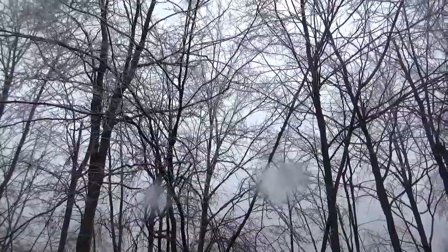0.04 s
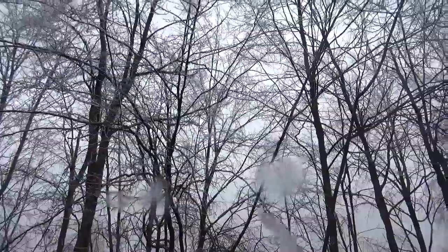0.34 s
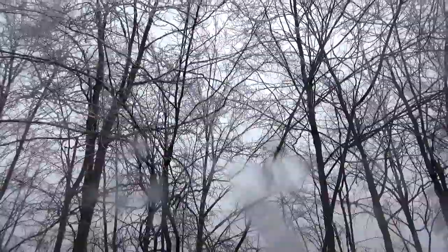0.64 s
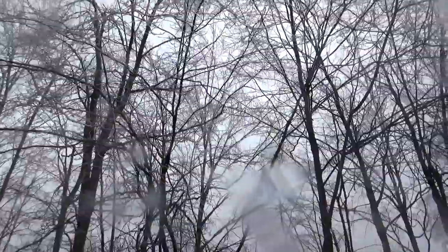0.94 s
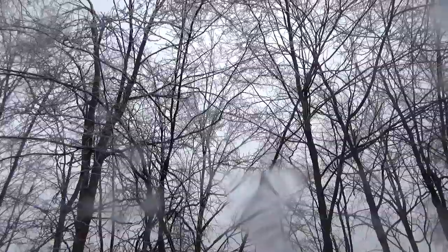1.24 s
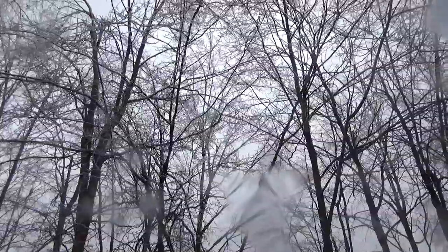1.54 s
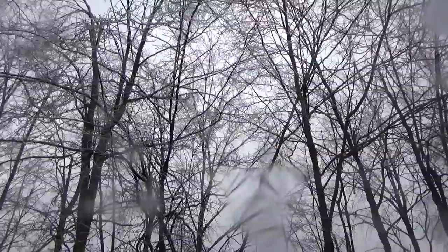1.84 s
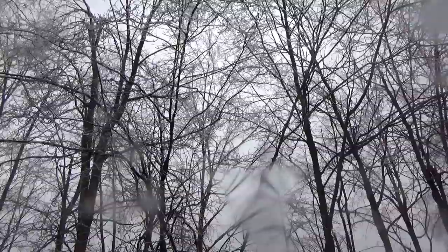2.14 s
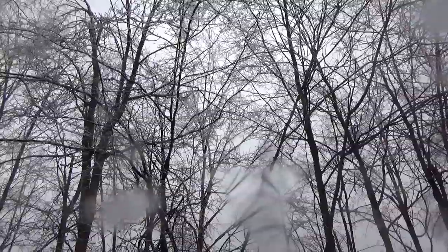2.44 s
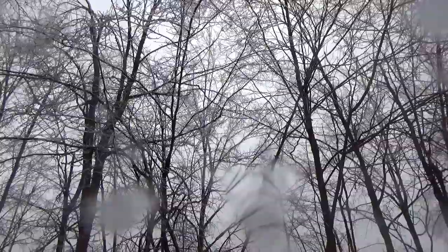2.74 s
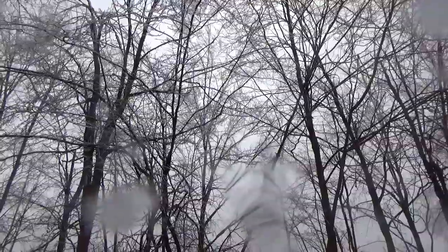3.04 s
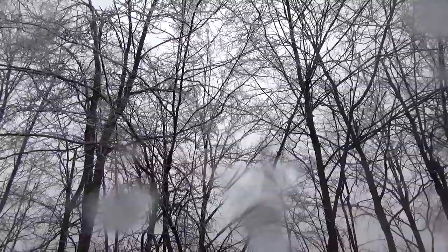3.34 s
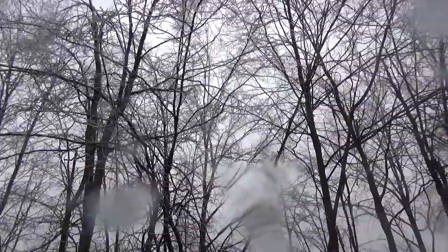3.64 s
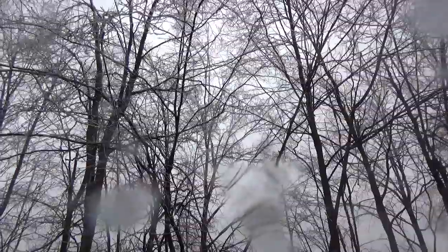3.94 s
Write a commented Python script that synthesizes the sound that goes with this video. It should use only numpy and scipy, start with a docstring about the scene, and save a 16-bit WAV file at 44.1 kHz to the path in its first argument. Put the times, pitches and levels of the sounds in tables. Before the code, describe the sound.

Freezing rain falls with a dense crackle, close taps and light wind on the microphone.

```python
"""A dense crackle of ice pellets over a far hiss, swelling and easing: freezing rain on bare trees
and frozen ground. Near pellets tick, heavier drops tap and splat, some thud on soft ground.
One pellet hits the microphone's case so hard that the limiter briefly ducks the rain.
Light wind buffets the microphone."""
import sys
import numpy as np
from scipy import signal
from scipy.fft import rfft, irfft
from scipy.io import wavfile
from scipy.ndimage import uniform_filter1d, minimum_filter1d

SR = 44100
rng = np.random.default_rng(int(sys.argv[2]) if len(sys.argv) > 2 else 0)


def materialize(psi):
    """Save the field psi as 16-bit PCM at rate SR to the path in sys.argv[1].

    A 1-D psi becomes a single channel; in a 2-D psi each row is a channel.
    """
    bounded = np.clip(np.atleast_2d(psi).T, -1, 1)
    quanta = np.round(bounded * 32767).astype(np.int16)
    wavfile.write(sys.argv[1], SR, quanta)


N = 176400
T = np.arange(N) / SR


def rain():
    """Far hiss, fine crackle and coarser ticks follow the strength of the shower."""
    # Each row: time in seconds, shower strength in dB.
    rainfall = [(0, -39), (.5, -40), (.8, -38.5), (1.0, -37), (1.25, -34.5), (1.45, -35), (1.75, -33),
                (1.85, -34), (2.03, -31.5), (2.15, -33.5), (2.35, -33.5), (2.6, -37), (2.8, -37),
                (2.95, -37), (3.52, -37.7), (3.58, -35.5), (3.77, -36), (3.85, -40.5), (4, -36.5)]
    # Each row: frequency in Hz, relative spectral density in dB.
    hiss_spectrum = [(200, -3.5), (450, -3.5), (900, -2.5), (1600, -4), (3000, -2.5), (4200, -3.5),
                     (5500, -3), (7000, -0.5), (9200, 1.84), (10200, 2), (11000, -8)]
    hiss = from_db(-1.5) * banded_noise(hiss_spectrum, patchy_db=1.28, flicker_hz=20.4, top_hz=15000)
    fine = from_db(-6.5) * crackle(per_s=5000, size_db=3.0, cycles=6, spread_db=16.5)
    coarse = from_db(-9.5) * crackle(per_s=170, size_db=3.5, cycles=4.1, spread_db=15)
    return from_db(in_time(rainfall)) * (hiss + fine + coarse) * panned(-0.35)


def crackle(per_s, size_db, cycles, spread_db, bands=16):
    """Pellets land at random all around, each with its own size, pitch and direction; rms 1."""
    # Each row: pellet pitch in Hz, relative level in dB.
    pitch_levels = [(900, -12), (1500, 0.5), (3000, 4), (5000, 0.5), (7000, 0), (9500, -4.5)]
    when, size, pitch, side, sign = rng.random((int(per_s * N / SR), 5)).T
    weight = np.minimum(-np.log(1 - size), 3.5)  # many small, few large
    height = from_db(size_db * weight) * np.sign(sign - .5)
    stereo = height * panned(spread_db * (2 * side - 1))
    band = (np.sqrt(pitch) * bands).astype(int)
    out = np.zeros((2, N))
    for k, hz in enumerate(np.geomspace(1000, 10000, bands)):
        in_band = band == k
        clicks = np.zeros((2, N))
        clicks[:, (when[in_band] * N).astype(int)] = stereo[:, in_band]
        out += from_db(at_hz(pitch_levels, hz)) * np.sqrt(hz) * resonate(clicks, hz, cycles)
    return rms_one(out)


def near_hits():
    """Close by, pellets tick, heavy drops tap and then splat, and drops on something soft thud."""
    # Each row: start in seconds, level in dB, pitch in Hz.
    pellets = [(0.0226, -30, 5100), (0.1502, -22, 8400), (0.3025, -19, 4370), (0.5576, -24.5, 5800),
               (0.697, -31, 5000), (.7981, -23, 7700), (.9492, -20.5, 6900), (.9964, -18.5, 3260),
               (1.0522, -23, 3800), (1.1297, -10, 8550), (1.13, -15, 3370), (1.3058, -16, 8600),
               (1.3778, -17, 7640), (1.508, -11, 7740), (1.6105, -16, 5700), (1.7026, -13.5, 5130),
               (1.8397, -15.5, 3000), (1.9816, -11, 3480), (2.0453, -12.5, 6400), (2.1203, -18, 4400),
               (2.1992, -14, 9100), (2.2165, -13.5, 5840), (2.5303, -19, 5600), (2.547, -17, 8100),
               (2.6813, -13.5, 6800), (3.0966, -18, 8500), (3.1489, -27, 5400), (3.2748, -28, 5800),
               (3.4546, -22, 4600), (3.5728, -21, 6000), (3.6225, -24, 7100), (3.7558, -18.5, 4100),
               (3.973, -20.5, 7200)]
    # Each row: start in seconds, tap level in dB, tap pitch in Hz, splat level in dB.
    drops = [(0.5458, -22, 3470, -31), (1.6165, -14, 5300, -27.5), (2.2906, -9.5, 2720, -19.5),
             (2.3064, -16, 3200, -27), (2.365, -14, 3500, -26), (2.3864, -11, 4200, -25),
             (2.5061, -12.5, 2720, -23), (2.519, -10.5, 6550, -24.5), (2.752, -12, 3600, -20),
             (2.7958, -21, 5800, -24), (2.9757, -12.5, 5470, -25.5), (3.0277, -11, 3000, -23.5),
             (3.1326, -19.5, 5200, -29.5), (3.7255, -15.5, 3770, -29)]
    # Each row: start in seconds, level in dB, pitch in Hz.
    thuds = [(0.0805, -23, 228), (.0999, -23, 900), (.7066, -31.5, 950), (0.9365, -30, 1130),
             (1.116, -26, 600), (1.1303, -23, 850), (1.5723, -25, 1300), (1.665, -28.5, 1300)]
    tick_shape = dict(cycles=3.1, spray_db=-20.5, spray_t60_s=0.028)
    tick_gain_db, tick_low_hz, splat_delay_s = 1.5, 1300, 0.007
    hard, soft = np.zeros((2, N))
    for start_s, db, hz in pellets:
        add(hard, start_s, from_db(db + tick_gain_db) * impact(hz, **tick_shape))
    for start_s, db, hz, splat_db in drops:
        add(hard, start_s, from_db(db + tick_gain_db) * impact(hz, **tick_shape))
        splat = impact(hz=1435, cycles=2.22, spray_db=-12.5, spray_t60_s=0.079, order=2)
        add(soft, start_s + splat_delay_s, from_db(splat_db) * splat)
    for start_s, db, hz in thuds:
        thud = impact(hz, cycles=2.03, spray_db=-22, spray_t60_s=0.04, order=2)
        add(soft, start_s, from_db(db) * thud)
    high_pass = signal.butter(2, tick_low_hz, "high", fs=SR, output="sos")
    hard = signal.sosfilt(high_pass, hard + 1e-18)
    return (hard + soft) * panned(-4.5)


def impact(hz, cycles, spray_db, spray_t60_s, order=1):
    """One contact of peak 1, then a dying spray of fragments; a higher order makes it rounder."""
    t = T[:SR // 10]
    parts = np.array([t == 0, rng.standard_normal(len(t))])  # impulse, noise
    for _ in range(order):
        parts = resonate(parts, hz, cycles)
    contact, spray = parts
    envelope = (1 - np.exp(-t * hz)) * np.exp(-np.log(1000) * t / spray_t60_s)
    return contact / np.abs(contact).max() + rms_one(spray) * from_db(spray_db) * envelope


def case_knock():
    """A pellet strikes the microphone's case, sets its modes ringing and shatters."""
    # Each row: frequency in Hz, level relative to the blow in dB, t60 in seconds.
    modes = [(125, -22.5, 0.035), (280, -24, 0.022), (1970, -17, 0.0078), (2520, -17, 0.011),
             (2810, -5.5, 0.0036), (3400, -7, 0.013), (5560, -20, 0.0035), (7200, -15, 0.0031),
             (8170, -13.5, 0.0042), (9360, -11, 0.003)]
    start_s, blow_db = 0.4014, 11
    shatter_db, shatter_t60_s, shatter_band_hz = -5, 0.01, [1780, 9150]
    blow, shatter = np.zeros(N), np.zeros((2, N))
    add(blow, start_s, from_db([blow_db]))
    ringing = sum((-1) ** k * from_db(db) * ring(blow, hz, t60_s)
                  for k, (hz, db, t60_s) in enumerate(modes))
    t = T[:SR // 10]
    band_pass = signal.butter(2, shatter_band_hz, "band", fs=SR, output="sos")
    fragments = rms_one(signal.sosfilt(band_pass, rng.standard_normal((2, len(t)))))
    decay = np.exp(-np.log(1000) * t / shatter_t60_s)
    add(shatter, start_s, from_db(shatter_db) * fragments * decay)
    return ringing + shatter


def wind():
    """Lumpy buffets on the microphone over a rumble of open air that follows them a little."""
    # Each row: time in seconds, gust level in dB.
    gusts = [(0, -44), (.23, -52.5), (.36, -39.5), (.44, -41.5), (.54, -37), (.59, -51), (.62, -37),
             (.67, -46.5), (.75, -34.5), (.84, -48), (1.02, -32.5), (1.13, -44), (1.22, -48), (1.32, -35),
             (1.39, -41.5), (1.46, -38), (1.56, -49), (1.62, -40.5), (1.79, -40.5), (1.91, -46),
             (2.02, -33.5), (2.08, -36), (2.12, -52), (2.2, -45), (2.45, -49.5), (2.56, -51), (3.6, -62),
             (3.73, -55), (3.84, -66)]
    # Each row of both: frequency in Hz, relative spectral density in dB.
    buffet_spectrum = [(20, -28), (45, -10), (70, -2.5), (100, 1.5), (150, -2), (220, -9), (330, -18),
                       (600, -35), (1500, -61)]
    rumble_spectrum = [(20, -7), (45, 1), (100, -5), (200, -11.5), (400, -16.5), (900, -19.5), (2500, -32)]
    gust_db = in_time(gusts)
    lumps_db = 2.5 * np.clip(drift(rate_hz=25), -2, 2)
    rumble_db = -47.5 + 0.14 * (gust_db - gust_db.mean())
    buffets = banded_noise(buffet_spectrum, patchy_db=1.5, flicker_hz=16, top_hz=1800)
    rumble = banded_noise(rumble_spectrum, patchy_db=2.0, flicker_hz=6, top_hz=3000)
    return from_db(gust_db + lumps_db) * buffets + from_db(rumble_db) * rumble


def banded_noise(spectrum, patchy_db, flicker_hz, top_hz):
    """Stereo noise in 0.4-octave bands, each with its own level, flicker and width; rms 1."""
    # Each row: frequency in Hz, left-right correlation from 0 to 1.
    correlation = [(40, 0.97), (110, 0.88), (220, 0.39), (450, 0.79), (900, 0.76), (3000, 0.77),
                   (6000, .72), (10000, 0.89)]
    out, common_flicker = 0, drift(flicker_hz)
    edges_hz = 18 * 2 ** np.arange(0, 9.7, .4)
    edges_hz = edges_hz[edges_hz < top_hz]
    white = rng.standard_normal((2, 2, N))
    for k, (low_hz, high_hz) in enumerate(zip(edges_hz, edges_hz[1:])):
        band_pass = signal.butter(2, [low_hz, high_hz], "band", fs=SR, output="sos")
        mid, side = signal.sosfilt(band_pass, white[k % 2])  # adjacent bands independent
        hz = np.sqrt(low_hz * high_hz)
        alike = at_hz(correlation, hz)
        stereo = np.sqrt(1 + alike) * mid + np.sqrt(1 - alike) * side * [[1], [-1]]
        flicker_db = patchy_db * (0.66 * common_flicker + drift(flicker_hz))
        out = out + from_db(at_hz(spectrum, hz) + flicker_db) * stereo
    return rms_one(out)


def drift(rate_hz):
    """Slow random wander, rms about 1."""
    step, settle = 40, 2000
    r = np.exp(-2 * np.pi * rate_hz * step / SR)
    white = rng.standard_normal(N // step + settle + 2)
    slow = signal.lfilter([1], [1, -2 * r, r * r], white)[settle:]
    return np.interp(np.arange(N) / step, np.arange(len(slow)), rms_one(slow))


def resonate(x, hz, cycles):
    """A broad resonance that falls 60 dB in the given cycles and passes no bass."""
    r, w = 1000 ** (-hz / (cycles * SR)), 2 * np.pi * hz / SR
    return signal.lfilter([1, 0, -1], [1, -2 * r * np.cos(w), r * r], x + 1e-18)


def ring(clicks, hz, t60_s):
    """One mode: a unit click starts a decaying sine of height 1."""
    r, w = 1000 ** (-1 / (t60_s * SR)), 2 * np.pi * hz / SR
    return signal.lfilter([0, np.sin(w)], [1, -2 * r * np.cos(w), r * r], clicks + 1e-18)


def from_db(db):
    """Decibels to gain."""
    return 10 ** (np.asarray(db) / 20)


def rms_one(x):
    """Scale to unit rms."""
    return x / np.sqrt(np.mean(x ** 2) + 1e-20)


def in_time(rows):
    """Interpolate (seconds, value) rows at every sample."""
    return np.interp(T, *np.transpose(rows))


def at_hz(rows, hz):
    """Interpolate (Hz, value) rows on a log-frequency axis."""
    row_hz, values = np.transpose(rows)
    return np.interp(np.log(hz), np.log(row_hz), values)


def panned(left_minus_right_db):
    """Left and right gains for a level difference."""
    return from_db(np.array([[.5], [-.5]]) * left_minus_right_db)


def add(out, start_s, sound):
    """Mix a sound in at a time."""
    i = max(int(start_s * SR), 0)
    out[..., i:i + sound.shape[-1]] += sound[..., :max(N - i, 0)]


def scene():
    """Rain, near hits, the knock and wind, in stereo."""
    return rain() + near_hits() + case_knock() + wind()


def record(dry):
    """A fast limiter ducks after overloads; the top rolls off and is cut steeply."""
    limit_db, release_db_per_s = -3, 300
    roll_off_hz, cutoff_hz = 10790, 11080
    peak_db = 20 * np.log10(np.abs(dry).max(axis=0) + 1e-9)
    over_db = np.maximum(peak_db - limit_db, 0)
    duck_db = np.maximum.accumulate(over_db + release_db_per_s * T) - release_db_per_s * T
    gain_db = uniform_filter1d(minimum_filter1d(-duck_db, size=17), size=17)
    limited = dry * from_db(gain_db)
    hz = np.arange(N + 1) * SR / (2 * N)
    roll_off = 1 / np.sqrt(1 + (hz / roll_off_hz) ** 24)
    cut = np.clip((cutoff_hz - hz) / 200 + .5, 0, 1)
    return irfft(rfft(limited, 2 * N) * roll_off * cut)[:, :N]


dry = scene()
out = record(dry)
materialize(out)
```